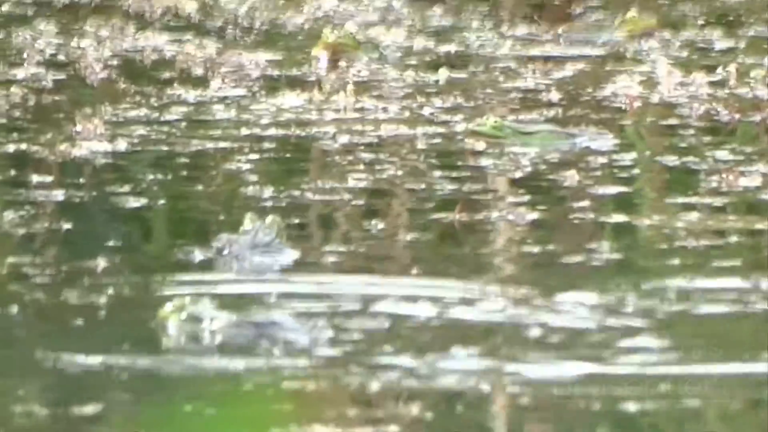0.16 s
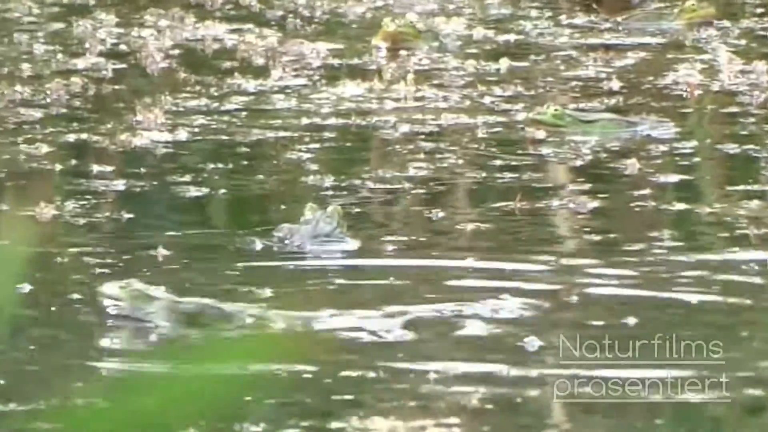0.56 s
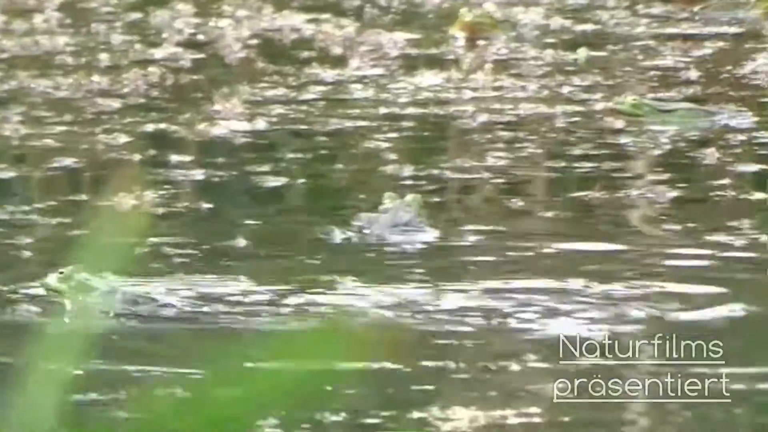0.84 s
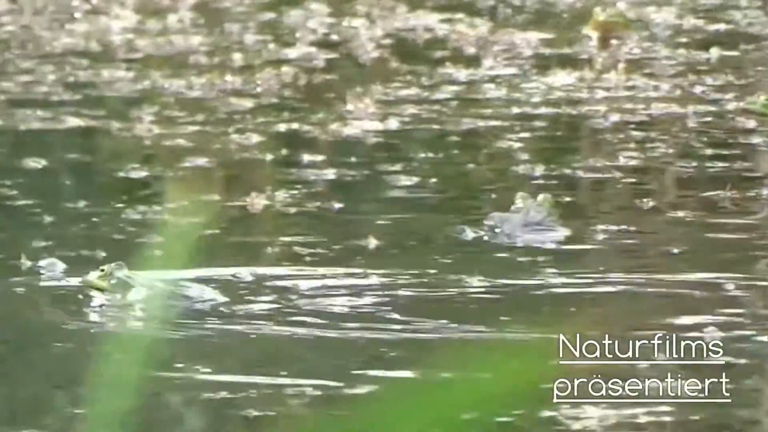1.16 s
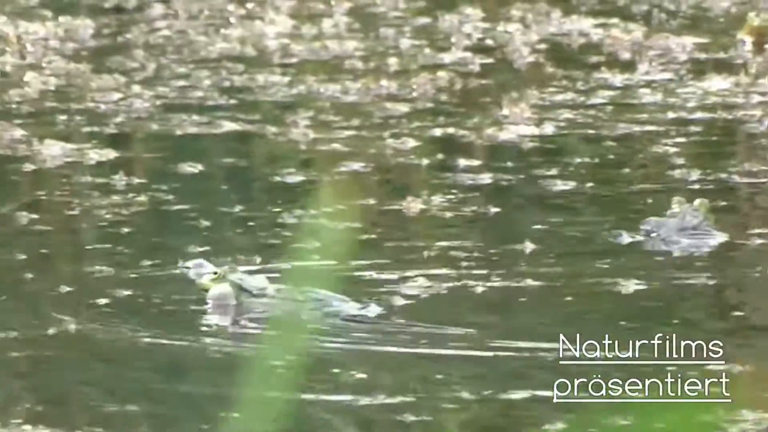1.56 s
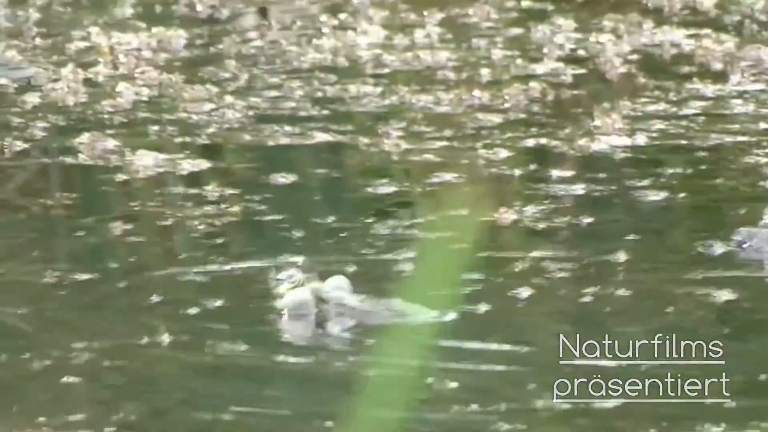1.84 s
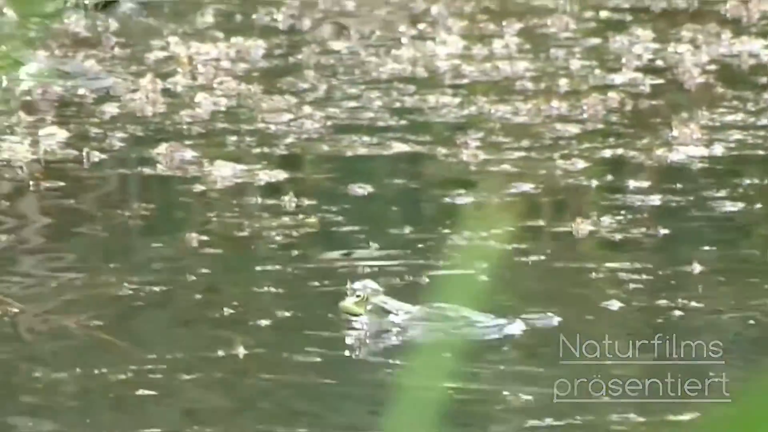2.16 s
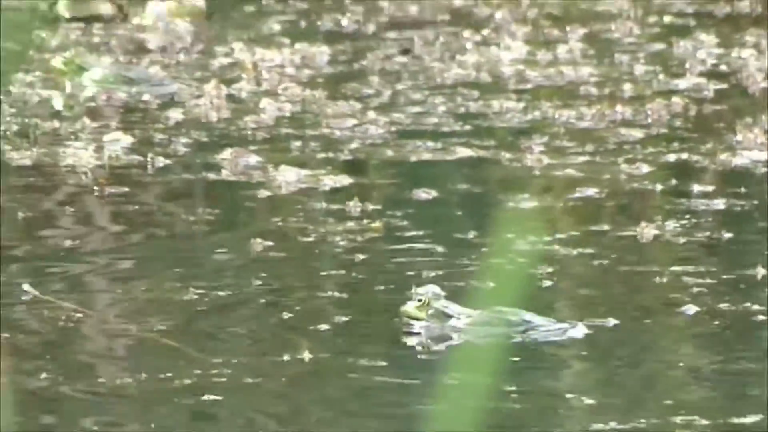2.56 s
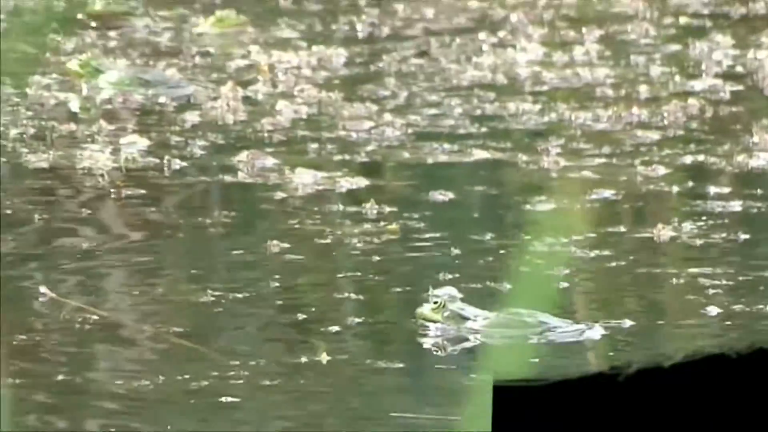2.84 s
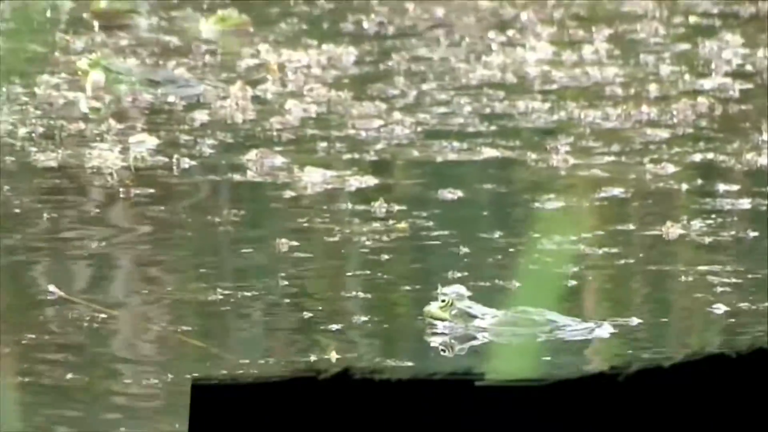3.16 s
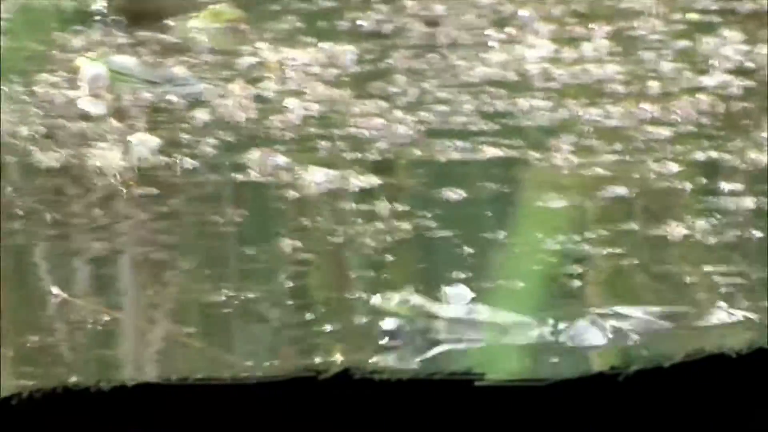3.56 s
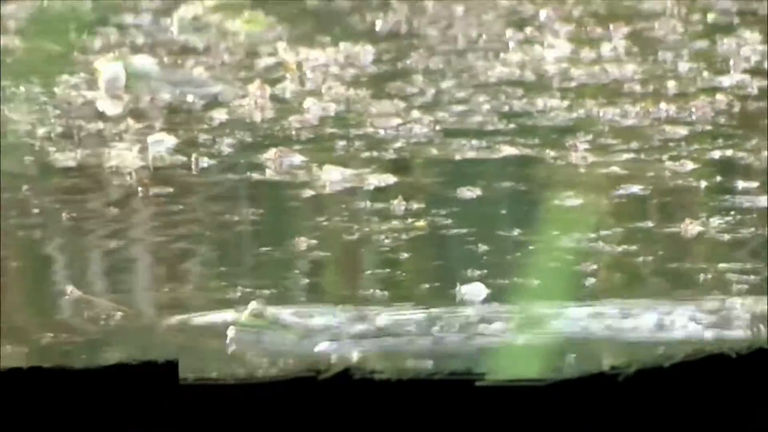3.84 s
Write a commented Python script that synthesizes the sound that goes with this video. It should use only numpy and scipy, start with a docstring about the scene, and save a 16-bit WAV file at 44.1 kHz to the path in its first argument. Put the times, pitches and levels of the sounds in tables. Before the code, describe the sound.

Frogs croak at moderate distance from the microphone, starting with quick ticks, then throaty pulsed croaks and a closing rattle; faint bird chirps, one tiny water plip and a distant frog chorus fill the open air.

```python
"""Out of a quick fade-in come a far frog's purr, a short croak and dry ticks with a steady high ringing under them.
Rolling croaks and one long rattle follow across the pond; all the calls are pulses that ring a vocal sac.
Small birds whistle (gliding sines) and buzz (fast frequency modulation with filtered noise), echoing off trees.
A small splash is a decaying noise burst; random far pulses make a chorus, and shaped noise a low rumble."""
import sys
import numpy as np
from scipy import signal
from scipy.fft import rfft, irfft
from scipy.io import wavfile
from scipy.ndimage import uniform_filter1d

SR = 44100
rng = np.random.default_rng(int(sys.argv[2]) if len(sys.argv) > 2 else 0)


def inscribe(sig):
    """Save sig as 16-bit PCM at rate SR to the path in sys.argv[1].

    A 1-D sig is mono; a 2-D sig holds one channel per row.
    Samples are clipped to [-1, 1] before scaling.
    """
    pcm = np.round(np.clip(np.atleast_2d(sig).T, -1, 1) * 32767)
    wavfile.write(sys.argv[1], SR, pcm.astype(np.int16))


N = 176400

# Vocal sac modes: (multiple of the main resonance, level [dB], decay time [s]);
# the first decay time is multiplied by each call's ring factor
SAC_MODES = [(0.999, 16, 0.0021), (1.17, -23.5, 0.0016), (1.5, -1, 0.00078), (2.101, -14, 0.0014)]
SAC_RISE_S = 0.00013
BODY_HZ, BODY_DECAY_S = 548, 0.0039  # low body mode; its pitch varies at random about this
OVERTONE_DECAY_S = 0.016
FROG_BAND_HZ = (380, 4900)

# Series of single ticks, one for each frog:
# (overtone [Hz], overtone level [dB], twang level [dB], [(time [s], level [dB], resonance [Hz]), ..])
TICK_SERIES = [ (3620, -22, -43.5, [(0.2074, -32.5, 1780), (0.2459, -29, 1810), (0.2874, -29.5, 1740),
               (0.3303, -29, 1840), (.3762, -28.5, 1743), (.4162, -28, 1820), (0.4512, -30.5, 1700),
               (0.4944, -32.5, 1640), (0.535, -28, 1460), (0.5771, -28, 1430), (0.6272, -28, 1316)]),
               (4350, -13.5, -38, [(2.139, -24, 1461), (2.1504, -20.5, 1520), (2.1861, -20.5, 1650),
               (2.201, -26, 1605), (2.2328, -22, 1520)]), (4400, -26, -46, [(3.893, -34.5, 1320),
               (3.932, -33, 1390), (3.972, -30.5, 1520)])]
AFTER_TICK_S, AFTER_TICK_DB = 0.0155, -7.5  # longest delay is this; level relative to the tick

# Croaks: (ring factor, [(time [s], level [dB], resonance [Hz], pulse rate [1/s]), ..])
CROAK_CURVES = [ (1.8, [(.125, -33, 1610, 136), (.175, -40.5, 1220, 113), (.235, -42, 1180, 118)]),
                (0.55, [(.78, -48, 1300, 156), (.868, -46, 1633, 185), (.885, -32, 1650, 160),
                (.912, -30, 1560, 127), (.935, -26, 1690, 108), (.972, -23, 1720, 110),
                (.985, -27.5, 1360, 160), (1.004, -24.5, 1340, 115)]), (1.48, [(1.64, -42.5, 1380, 128),
                (1.70, -33.5, 1355, 136), (1.775, -29, 1230, 146), (1.80, -25, 1196, 114),
                (1.855, -20, 1270, 122), (1.88, -32, 880, 128)]), (0.88, [(1.96, -31, 860, 112),
                (2.0, -27.5, 972, 108.5), (2.06, -24, 1200, 94), (2.10, -22, 1360, 84),
                (2.125, -23, 1410, 82)]), (0.86, [(2.34, -42, 830, 138), (2.42, -32, 981, 153),
                (2.49, -26, 1145, 150), (2.52, -22, 1178, 144), (2.545, -47, 1000, 194)]),
                (0.77, [(2.82, -31.5, 903, 150), (2.85, -28, 1119, 160), (2.885, -29, 1327, 168),
                (2.925, -19.5, 1351, 208), (2.945, -38, 1289, 106), (2.99, -22, 1350, 158),
                (3.028, -25.5, 1180, 128)]), (1.35, [(3.29, -40, 1420, 174), (3.46, -38, 1389, 170),
                (3.515, -27.5, 1273, 164), (3.565, -27, 1255, 177)])]
JITTER_PERIODS, UNEVEN_DB = 0.1, 0.2  # random spread of pulse timing and level

# Notes of the rattle: (time of the strong second pulse [s], level [dB])
RATTLE_NOTES = [(3.029, -34), (3.074, -31), (3.118, -29.5), (3.16, -30), (3.206, -28), (3.257, -27),
                (3.30, -25), (3.339, -24), (3.378, -23), (3.4137, -21), (3.457, -21.5), (3.494, -20.5),
                (3.531, -19), (3.5684, -22), (3.6088, -22), (3.649, -21.5), (3.6925, -23), (3.7255, -22.5),
                (3.7649, -23.5), (3.799, -25)]
# Resonance during the rattle: (time [s], resonance [Hz])
RATTLE_RESONANCE = [(3.22, 1957), (3.31, 1839), (3.46, 2050), (3.72, 2246), (3.81, 2016)]
NOTE_SHAPE_DB, NOTE_GAP_S = (-8.5, -0.5, -0.5, -8.5), 0.0091  # relative pulse levels (before accent), spacing
RATTLE_RING = (1.35, 0.9)  # ring factor, first note to last
RATTLE_ACCENT = (1.07, 0.57)  # multiplies the note shape, first note to last

# A far frog's trill: quick notes, each sweeping upward
TRILL_S, TRILL_DB = (1.11, 1.53), -46
TRILL_NOTES_PER_S, TRILL_PULSES_PER_S = 49, 395
TRILL_FROM_HZ, TRILL_TO_HZ = 1890, 2439

# Far frogs purring, and (second row) a steady high ringing under the early ticks:
# (start [s], end [s], level [dB], resonance [Hz], ring factor)
PURRS_AND_RINGING = [(0.097, 0.146, -34, 2570, 1.1), (0.199, 0.694, -49.5, 3640, 1.8),
                     (0.716, 0.77, -43, 2560, 1.8), (1.101, 1.49, -55.5, 1247, 3.64),
                     (1.547, 1.696, -43.5, 1211, 12), (2.73, 2.823, -42.5, 1388, 9.4)]
CHORUS_PER_S, CHORUS_DB = 130, -52  # level of the strongest chorus pulses

# Bird whistles before the mix gain, each a curve: (time [s], frequency [Hz], level [dB])
WHISTLE_CURVES = [
    [(1.10, 5180, -37), (1.111, 8800, -48), (1.12, 10040, -59.5), (1.152, 8160, -51), (1.175, 4900, -51.5),
     (1.22, 3600, -49)],
    [(3.523, 6660, -49.5), (3.54, 10100, -63.5), (3.57, 7600, -57.5)],
]
# Short bird chirps before the mix gain: (time [s], length [s], start [Hz], end [Hz], level [dB])
CHIRP_GLIDES = [(0.794, 0.075, 4170, 2880, -58), (0.881, 0.025, 8270, 7550, -62.5),
                (0.939, .04, 8530, 7340, -62), (1.027, .045, 5450, 6250, -51.5),
                (2.039, .09, 4550, 4380, -60.5), (2.247, .05, 3682, 4003, -50),
                (2.323, 0.043, 4900, 3478, -50), (2.371, 0.037, 3486, 3810, -56),
                (2.42, 0.045, 4700, 6250, -58), (2.52, 0.066, 5850, 4700, -57),
                (2.661, .05, 3716, 3040, -55), (2.71, 0.035, 4818, 6204, -58),
                (3.437, 0.038, 4196, 6266, -51)]

# Buzzy bird calls before the mix gain, each a curve:
# (time [s], centre frequency [Hz], tone level [dB], rasp level [dB])
BUZZ_CURVES = [
    [(1.25, 3986, -63, -78), (1.38, 4110, -51, -64), (1.58, 3310, -51, -80)],
    [(1.665, 4326, -44.5, -60), (1.71, 4534, -40, -43.5), (1.79, 4360, -36, -42), (1.86, 3830, -37.5, -53),
     (1.95, 3220, -42.5, -51)],
    [(2.775, 4336, -44.5, -57), (2.82, 4488, -46, -44.5), (2.89, 4262, -38, -47), (2.97, 3620, -38.5, -54),
     (3.12, 3010, -48, -62.5)],
    [(3.56, 4700, -50, -58), (3.63, 3945, -44, -59.5), (3.79, 2910, -57.5, -69)],
]
# Rasp spectrum: (frequency [Hz], relative level [dB])
RASP_SPECTRUM = [(1500, -36), (2600, -4.5), (4600, -10), (5600, -6), (7300, -8.5), (8400, -19),
                 (10000, -24), (12000, -60)]
BUZZ_PER_S, BUZZ_SWING_HZ = 100, 406

# Splash spectrum: (frequency [Hz], relative level [dB])
SPLASH_SPECTRUM = [(300, -25), (1600, 0), (3000, -5), (5500, -1), (8000, -11), (11000, -28), (15000, -52)]
SPLASH_S, SPLASH_DB = 1.0232, -32

# Background noise spectrum: (frequency [Hz], relative level [dB per Hz])
FLOOR_SPECTRUM = [(20, -19), (60, 2.5), (120, -4.5), (170, -11), (290, -19.5), (450, -9.5), (1300, -9),
                  (2100, -13), (4000, -14.5), (5200, -27.5), (8000, -29.5), (12500, -50.5), (16000, -62)]
FLOOR_DB = -54

ECHO_T60_S, SCATTER_S, STEREO_WIDTH = 0.69, 0.018, 0.18
OPEN_S, EDGE_HZ = (0.041, 0.2), 15700  # fade-in start and end; upper band limit


def amp(db):
    """A level in decibels is twenty times the logarithm of gain."""
    return 10 ** (np.asarray(db) / 20)


def unit(x):
    """Dividing by the root-mean-square value gives unit power."""
    return x / np.sqrt(np.mean(x ** 2) + 1e-20)


def read(points, hz):
    """Interpolation on a logarithmic frequency axis reads a spectrum."""
    f, value = np.transpose(points)
    return np.interp(np.log(hz + 1), np.log(f + 1), value)


def follow(rows, t):
    """Linear interpolation in time reads every column of a curve."""
    s, *columns = np.transpose(rows)
    return [np.interp(t, s, c) for c in columns]


def add(mix, s, sound):
    """Superposition: sounds add linearly, here from s seconds on."""
    part = mix[max(round(s * SR), 0):][:len(sound)]
    part += sound[:len(part)]


def noise(points, size):
    """Spectral shaping: white noise weighted in frequency, at unit power."""
    spectrum = rfft(rng.standard_normal(size))
    gain = amp(read(points, np.fft.rfftfreq(size, 1 / SR)))
    return unit(irfft(spectrum * gain, size))


def wander(size, corner_hz):
    """A one-pole low-pass turns white noise into a smooth random drift."""
    pole = np.exp(-2 * np.pi * corner_hz / SR)
    return unit(signal.lfilter([1], [1, -pole], rng.standard_normal(size)))


def pulse(db, hz, ring, body_db=-20, overtone_hz=4400, overtone_db=-30):
    """Impulse excitation: one snap of the larynx rings damped modes of sac and body, and an overtone."""
    t = np.arange(2048) / SR
    modes = [(hz * ratio, level, decay * (ring if k == 0 else 1))
             for k, (ratio, level, decay) in enumerate(SAC_MODES)]
    modes.append((BODY_HZ * rng.uniform(0.83, 1.44), body_db, BODY_DECAY_S))
    modes.append((overtone_hz * rng.normal(1, 0.016), overtone_db, OVERTONE_DECAY_S))
    wave = sum(amp(level) * np.exp(-t / decay) * np.sin(2 * np.pi * f * t) for f, level, decay in modes)
    wave *= (1 - np.exp(-t / SAC_RISE_S)) ** 2
    return amp(db) * wave / abs(wave).max()  # db is the peak level


def radiated(x):
    """Radiation efficiency: a small animal gives off no bass and little treble."""
    low_hz, high_hz = FROG_BAND_HZ
    x = signal.sosfilt(signal.butter(8, low_hz, "high", fs=SR, output="sos"), x)
    return signal.sosfilt(signal.butter(4, high_hz, fs=SR, output="sos"), x)


def ticks(ring=0.66, ring_hz=1700, twang_hz=2580):
    """Isolated impulses: each rings with twang, overtone and weak after-pulse, lower ones for longer."""
    out = np.zeros(N)
    for overtone_hz, overtone_db, twang_db, series in TICK_SERIES:
        for s, db, hz in series:
            tick_ring = ring * (ring_hz / hz) ** 2
            tick = pulse(db, hz, tick_ring, overtone_hz=overtone_hz, overtone_db=overtone_db)
            tick += pulse(twang_db, twang_hz, 1.38)
            add(out, s, tick)
            after_s = AFTER_TICK_S * rng.uniform(0.8, 1.0)
            add(out, s + after_s, amp(AFTER_TICK_DB) * tick)
    return radiated(out)


def croaks(scatter=0.012, body_start_db=-3, body_end_db=7, body_growth=0.42):
    """Pulse trains through a moving resonance; the body sounds more in loud croaks and toward each end."""
    out = np.zeros(N)
    for ring, curve in CROAK_CURVES:
        start, end = curve[0][0], curve[-1][0]
        loudest_db = max(row[1] for row in curve)
        s = start
        while s < end:
            db, hz, rate = follow(curve, s)
            late, loud, sharp = rng.standard_normal(3)
            body_db = np.interp(s, [start, end], [body_start_db, body_end_db]) + body_growth * loudest_db
            snap = pulse(db + UNEVEN_DB * loud, hz * (1 + scatter * sharp), ring, body_db, overtone_db=-20.5)
            add(out, s + JITTER_PERIODS * late / rate, snap)
            s += 1 / max(rate, 40)
    return radiated(out)


def rattle(scatter=0.032):
    """Grouped impulses: short notes whose ringing shortens and pulses even out into one dry roll."""
    out = np.zeros(N)
    rings = np.linspace(*RATTLE_RING, len(RATTLE_NOTES))
    accents = np.linspace(*RATTLE_ACCENT, len(RATTLE_NOTES))
    for (s, db), ring, accent in zip(RATTLE_NOTES, rings, accents):
        hz, = follow(RATTLE_RESONANCE, s)
        for k, shape_db in enumerate(NOTE_SHAPE_DB):
            late, uneven_db, sharp = rng.standard_normal(3)
            pulse_db = db + accent * shape_db + uneven_db
            snap = pulse(pulse_db, hz * (1 + scatter * sharp), ring, body_db=-6, overtone_hz=4700)
            add(out, s + NOTE_GAP_S * (k - 1 + 0.04 * late), snap)
    return radiated(out)


def trill(ring=1.85):
    """Sweeping resonance: fast pulses whose pitch climbs within every note."""
    out, (start, end) = np.zeros(N), TRILL_S
    for s in np.arange(start, end, 1 / TRILL_PULSES_PER_S):
        within = (s - start) * TRILL_NOTES_PER_S % 1  # position in the note, 0 to 1
        call_swell = np.sqrt(np.sin(np.pi * (s - start) / (end - start)))
        swell = np.sqrt(call_swell * np.sin(np.pi * within))
        hz = TRILL_FROM_HZ + (TRILL_TO_HZ - TRILL_FROM_HZ) * within
        add(out, s + rng.normal(0, 0.0002), swell * pulse(TRILL_DB, hz, ring))
    return radiated(out)


def purrs_ringing_and_chorus(rate=95):
    """Periodic against random excitation: far purrs and a high ringing over a far chorus's scattered pulses."""
    out = np.zeros(N)
    for start, end, db, hz, ring in PURRS_AND_RINGING:
        for s in np.arange(start, end, 1 / rate):
            swell = np.sin(np.pi * (s - start) / (end - start)) ** 0.5
            snap = pulse(db, hz * rng.normal(1, 0.0057), ring)
            add(out, s + rng.normal(0, 0.0007), swell * snap)
    for place, weakness, pitch in rng.random((int(CHORUS_PER_S * N / SR), 3)):
        snap = pulse(CHORUS_DB - 12 * weakness, 1100 + 1200 * pitch ** 2, 3.2)
        add(out, place * N / SR, snap)
    return radiated(out)


def whistles(curves, waver_hz):
    """Phase is the integral of frequency: thin gliding sine tones with a random waver."""
    out = np.zeros(N)
    for curve in curves:
        t = np.arange(curve[0][0], curve[-1][0], 1 / SR)
        hz, db = follow(curve, t)
        hz = uniform_filter1d(hz, size=300) + waver_hz * wander(len(t), 100)
        tone = np.sin(2 * np.pi * np.cumsum(hz) / SR)
        add(out, t[0], amp(db) * signal.windows.tukey(len(t), 0.15) * tone)
    return out


def songbirds():
    """Frequency waver sets roughness: clean whistles beside rougher short chirps."""
    chirps = [[(s, start_hz, db), (s + length, end_hz, db)]
              for s, length, start_hz, end_hz, db in CHIRP_GLIDES]
    return whistles(WHISTLE_CURVES, waver_hz=50) + whistles(chirps, waver_hz=260)


def buzzes(rough_hz=110, throb=0.047, under_db=-10, under_ratio=0.83, grain_db=6):
    """Frequency modulation: two bird voices warble very fast, with a rasp that pulses with the warble."""
    out = np.zeros(N)
    for curve in BUZZ_CURVES:
        t = np.arange(curve[0][0], curve[-1][0], 1 / SR)
        hz, tone_db, rasp_db = follow(curve, t)
        warble_rate = BUZZ_PER_S * (1 + 0.1 * wander(len(t), 26.6))
        warble = np.sin(2 * np.pi * np.cumsum(warble_rate) / SR)
        voice_hz = hz + BUZZ_SWING_HZ * warble + rough_hz * wander(len(t), 480)
        phase = 2 * np.pi * np.cumsum(voice_hz) / SR
        tones = amp(tone_db) * (np.sin(phase) + amp(under_db) * np.sin(under_ratio * phase))
        rasp = amp(rasp_db) * noise(RASP_SPECTRUM, len(t)) * unit(amp(grain_db * warble))
        envelope = (1 + throb * warble) * signal.windows.tukey(len(t), 0.08)
        add(out, t[0], (tones + rasp) * envelope)
    return out


def splash(decay_s=0.0029, spray_db=-15, spray_s=0.01):
    """Two-stage exponential decay of noise: a sharp plip on the water with a little spray."""
    out, t = np.zeros(N), np.arange(4096) / SR
    envelope = np.exp(-t / decay_s) + amp(spray_db) * np.exp(-t / spray_s)
    add(out, SPLASH_S, amp(SPLASH_DB) * noise(SPLASH_SPECTRUM, len(t)) * envelope)
    return out


def background(width=0.25, swell_db=1):
    """Stationary shaped noise: a low rumble and the blurred wash of the far pond, its level drifting."""
    mid = noise(FLOOR_SPECTRUM, N) * amp(swell_db * wander(N, 22))
    side = width * noise(FLOOR_SPECTRUM, N)
    side = signal.sosfilt(signal.butter(1, 250, "high", fs=SR, output="sos"), side)  # narrows the bass
    return amp(FLOOR_DB) * np.array([mid + side, mid - side])


def outdoors(x, near_db, tail_db, pan_db):
    """Convolution with random reflections: quick scatter off the banks, a longer echo from the trees."""
    t = np.arange(SR) / SR
    after_direct = t > 0.002
    taps = rng.standard_normal((2, SR)) * (rng.random((2, SR)) < 3000 / SR) * after_direct
    tail = taps * amp(-60 * t / ECHO_T60_S) * np.minimum(t / 0.032, 1)
    near = rng.standard_normal((2, SR)) * np.exp(-t / SCATTER_S) * after_direct
    response = (amp(tail_db) * unit(tail) + amp(near_db) * unit(near)) / np.sqrt(SR)
    mid, side = signal.fftconvolve(x[None], response, axes=1)[:, :N]
    left = (x + mid + STEREO_WIDTH * side) * amp(pan_db / 2)
    right = (x + mid - STEREO_WIDTH * side) * amp(-pan_db / 2)
    return np.array([left, right])


def scene():
    """Direct-to-reverberant ratio: the birds carry more scatter and echo than the frogs."""
    # positive pan_db leans left
    return (outdoors(ticks(), near_db=-10.5, tail_db=-11.5, pan_db=-0.5)
            + outdoors(croaks(), near_db=-11.5, tail_db=-8.5, pan_db=-0.96)
            + outdoors(rattle(), near_db=-6.5, tail_db=-10, pan_db=-0.5)
            + outdoors(trill() + purrs_ringing_and_chorus(), near_db=-9, tail_db=-14.5, pan_db=1.5)
            + amp(-1.5) * outdoors(songbirds(), near_db=1, tail_db=-1, pan_db=1.5)
            + amp(-3.5) * outdoors(buzzes(), near_db=-0.5, tail_db=-7.0, pan_db=-3.5)
            + outdoors(splash(), near_db=-10, tail_db=-11.5, pan_db=3)
            + background())


def record(dry):
    """Band limitation: a quick fade-in, then a steep linear-phase low-pass."""
    start, end = OPEN_S
    fade = np.clip((np.arange(N) / SR - start) / (end - start), 0, 1) ** 2
    lowpass = signal.firwin(511, EDGE_HZ, window=("kaiser", 9), fs=SR)
    return signal.oaconvolve(dry * fade, lowpass[None], "same")


dry = scene()
out = record(dry)
inscribe(out)
```